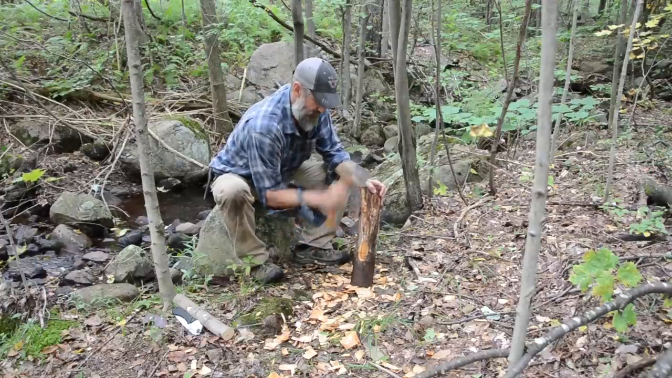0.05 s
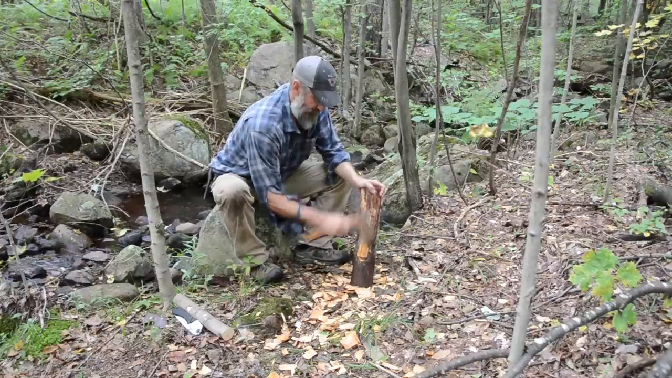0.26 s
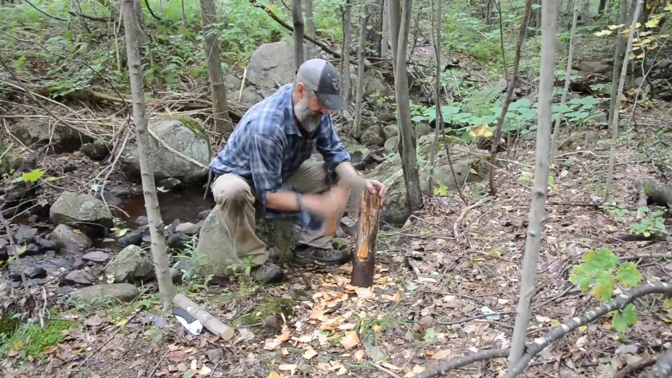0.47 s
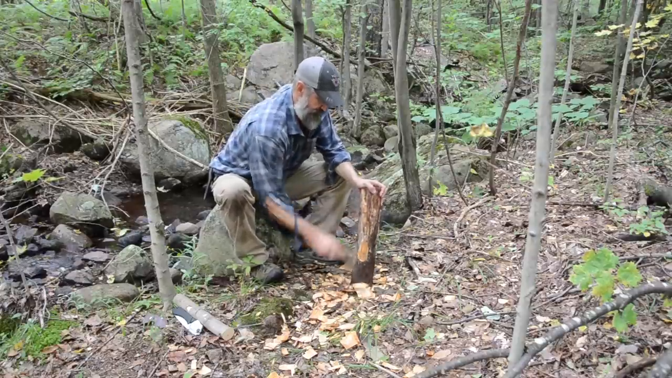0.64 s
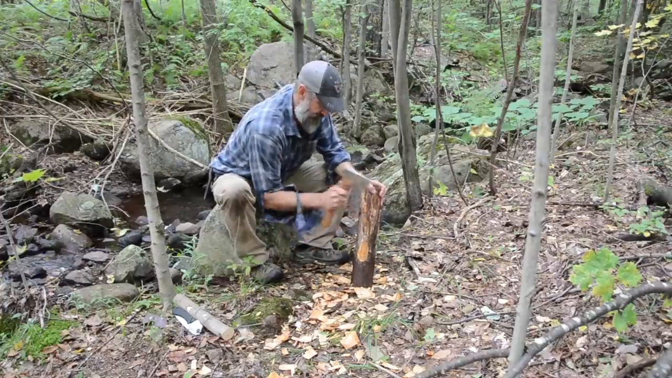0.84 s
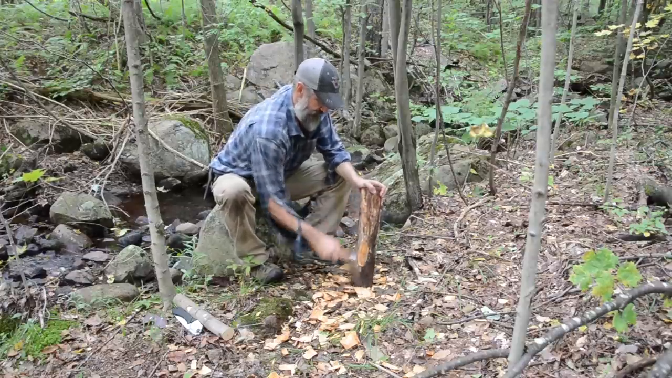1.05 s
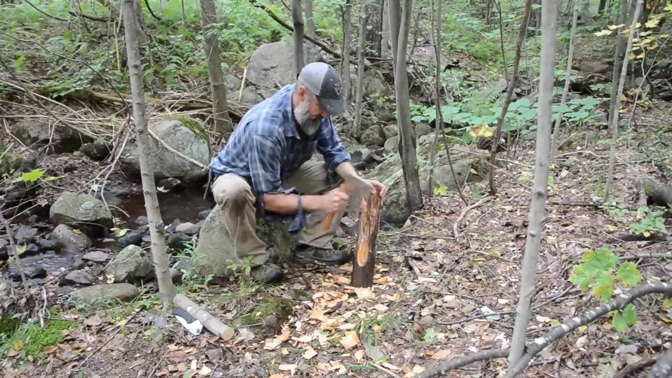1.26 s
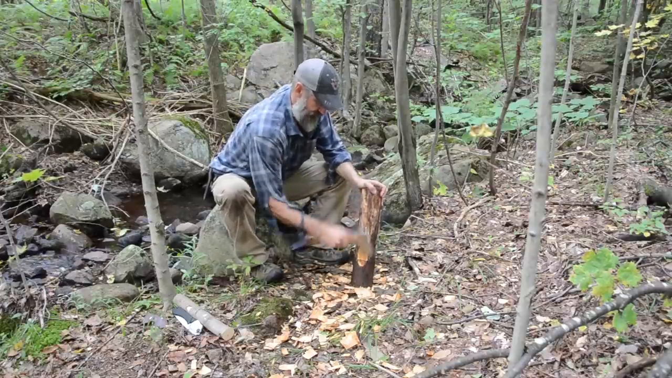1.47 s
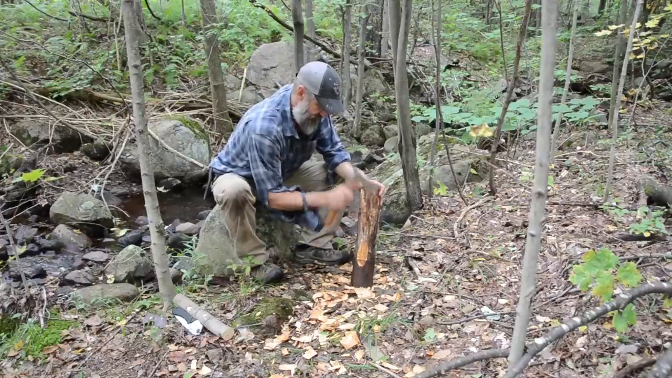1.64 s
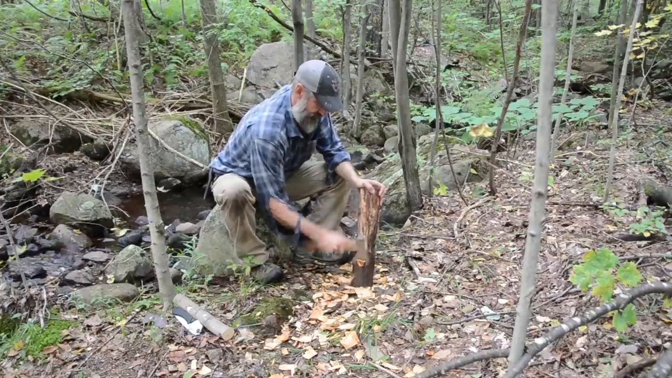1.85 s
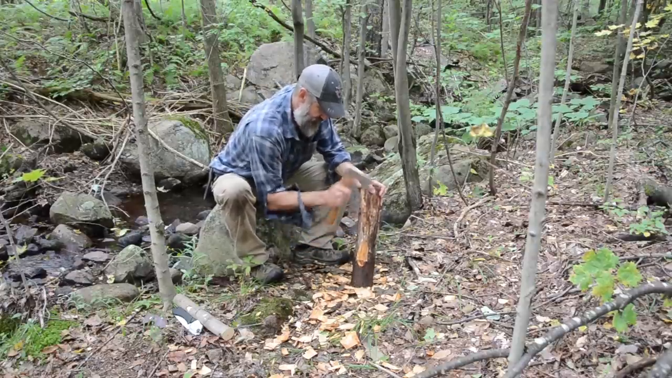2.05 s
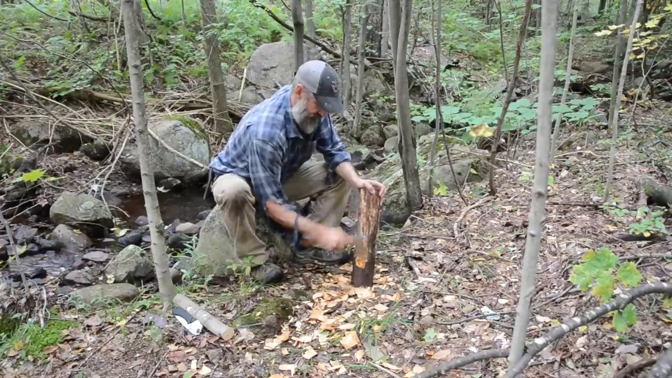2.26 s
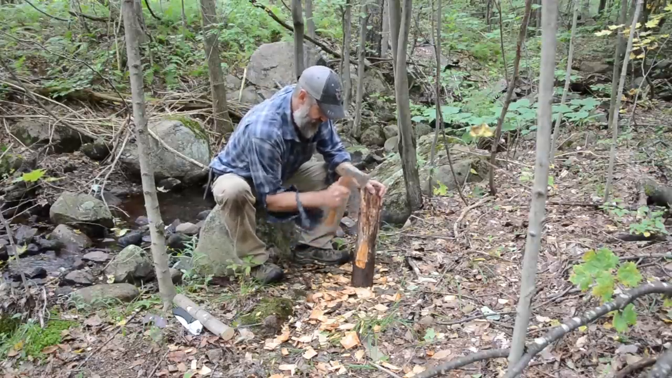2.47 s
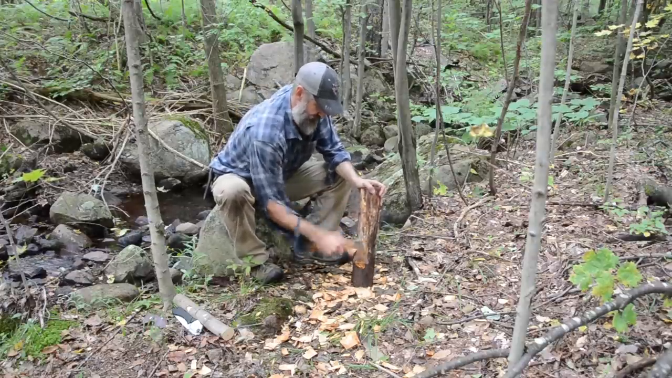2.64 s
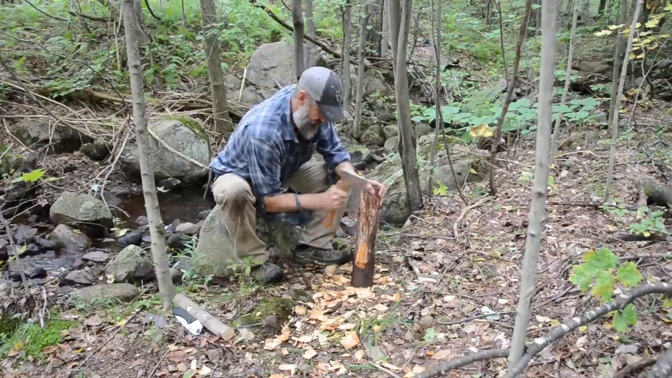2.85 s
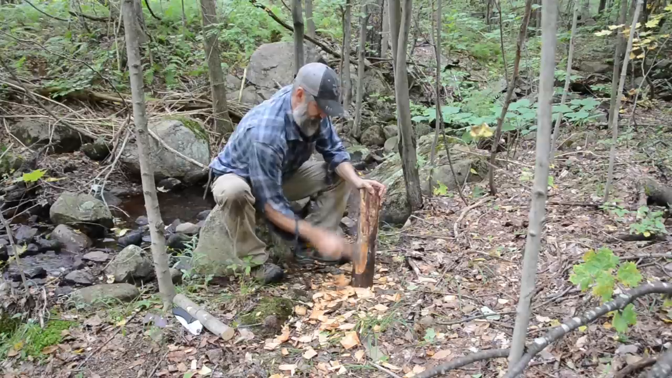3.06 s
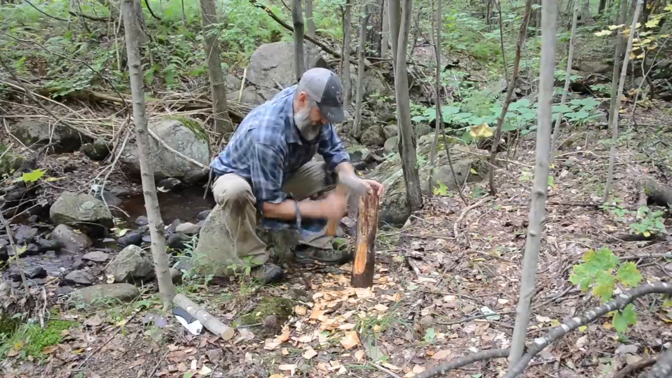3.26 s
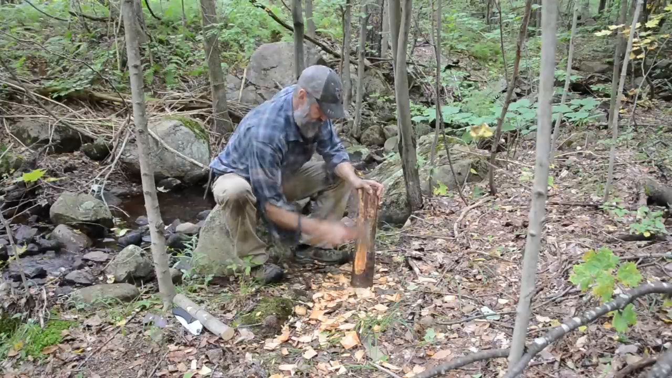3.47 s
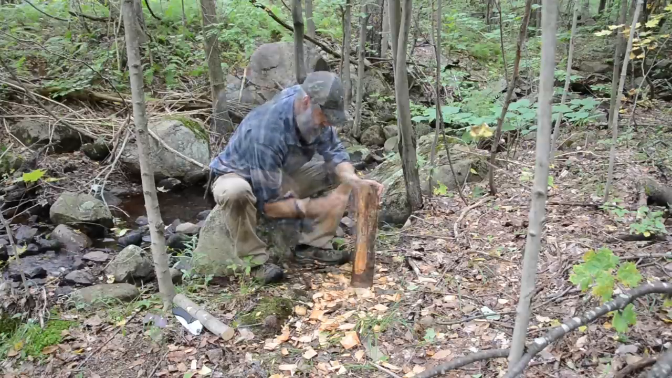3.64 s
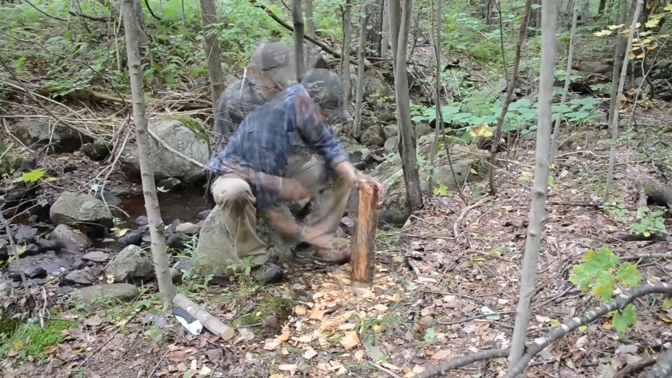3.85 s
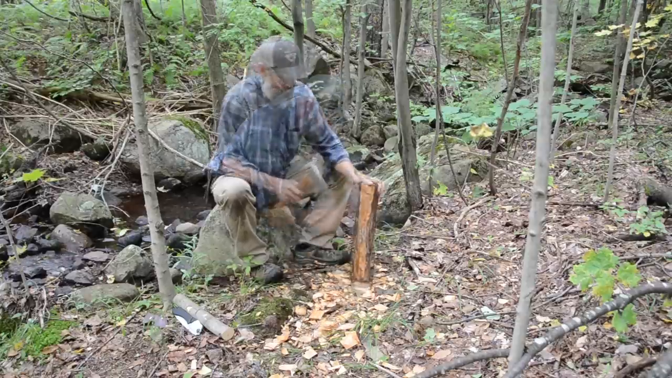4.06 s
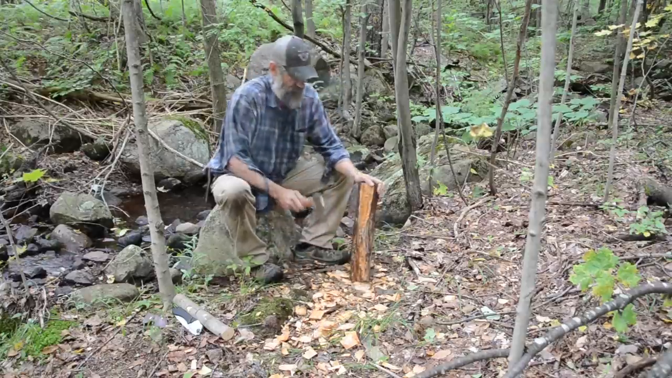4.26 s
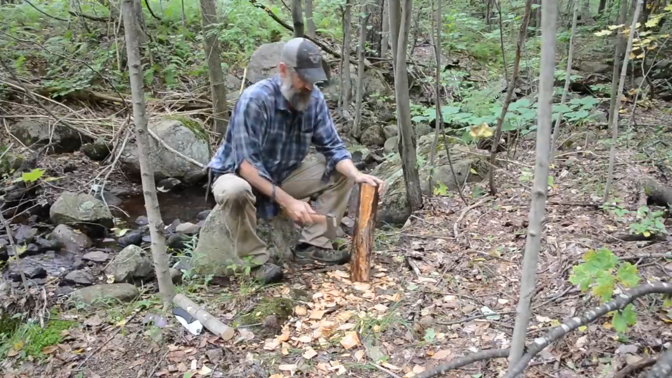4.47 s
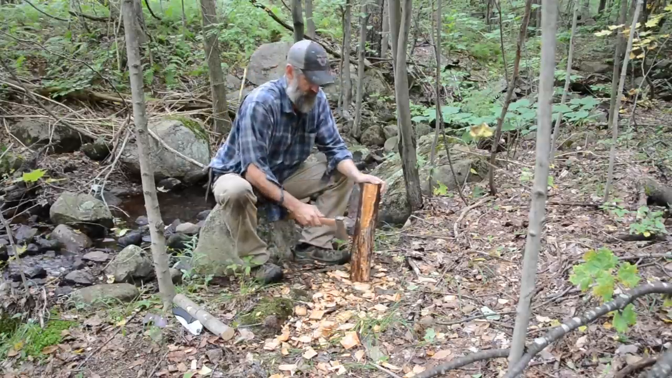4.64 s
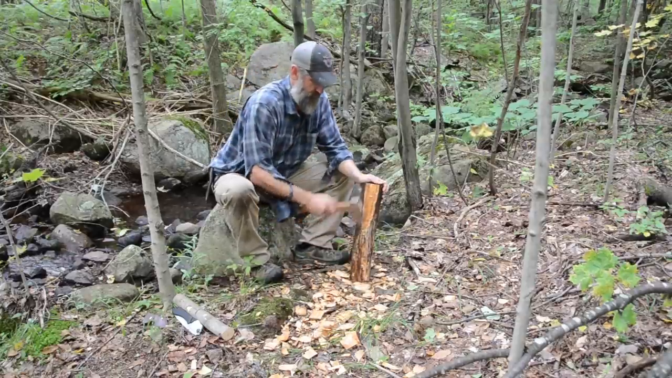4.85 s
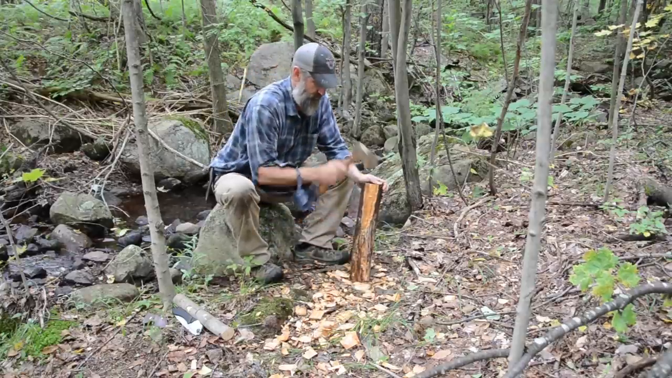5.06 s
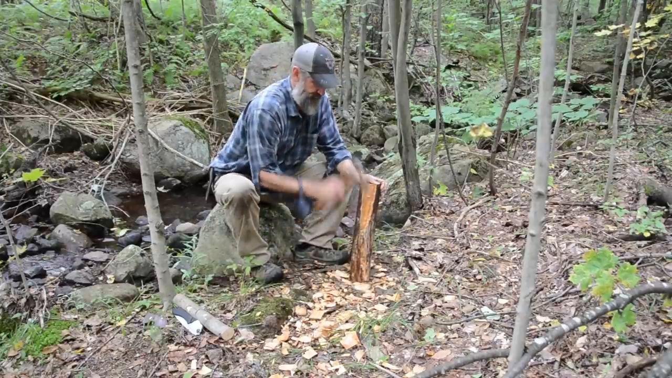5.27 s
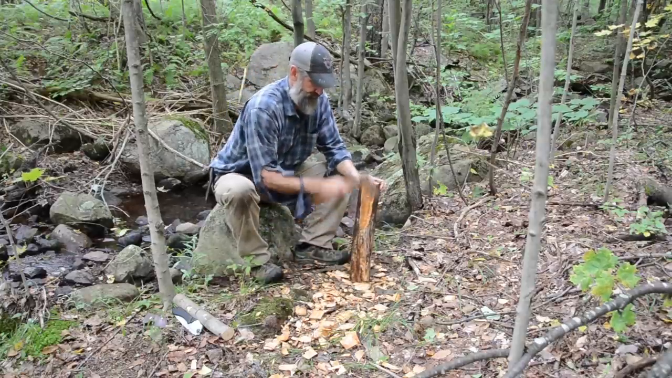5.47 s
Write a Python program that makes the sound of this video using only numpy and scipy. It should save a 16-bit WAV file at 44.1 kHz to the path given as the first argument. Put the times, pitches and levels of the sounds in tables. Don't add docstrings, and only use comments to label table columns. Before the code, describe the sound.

Outdoors in a wood, a hatchet strikes a small upright log ten times at an even pace of about 0.4 seconds. Each hard, dry crack overloads a microphone a few metres away, with splitting fibres, a dull log knock and short scatter off trunks. Chips tick and rustle into dry leaves. After about 3.9 seconds the blows stop and the creek is heard, with a faint cricket, then one weaker final chop.

```python
import sys
import numpy as np
from scipy import signal
from scipy.fft import rfft, irfft
from scipy.io import wavfile
from scipy.ndimage import uniform_filter1d

SR = 44100
rng = np.random.default_rng(int(sys.argv[2]) if len(sys.argv) > 2 else 0)


def file_out(sig):
    cols = np.atleast_2d(sig).T
    lim = np.clip(cols, -1, 1)
    pcm = np.round(lim * 32767).astype(np.int16)
    wavfile.write(sys.argv[1], SR, pcm)


def attenuation_scalar(level_db):
    decades = np.asarray(level_db, float) / 20
    return 10 ** decades


N = 242991

# start in seconds, peak level in dB, strongest log pitch in Hz,
# bite length in ms, edge crack level in dB.
BITES = [(0.202, 1.5, 1250, 5.2, 0), (0.602, 8, 1540, 4.4, -4), (1.0284, 8, 1510, 4.4, -9.5),
         (1.4519, 9, 1850, 2, -8.5), (1.8554, 6.5, 1360, 1.67, 2.5), (2.2523, 3.5, 1680, 3.06, -10.5),
         (2.644, 2.5, 1210, 3.1, -12), (3.0206, -0.5, 1170, 4.3, -5), (3.4171, 2.5, 1450, 3.57, -8),
         (3.8068, 6.5, 1670, 2.64, 1), (5.368, 0.5, 1180, 1.95, -19.5)]
# start in seconds, peak level in dB, log pitch in Hz,
# bite length in ms, edge crack level in dB.
SPLITS = [(0.6123, -2.5, 1240, 1.2, -4), (1.0325, -3, 1630, 2.6, 35), (1.041, 0.5, 1300, 3.5, 2),
          (1.454, 4, 1670, 1.8, 1), (1.860, 1, 1470, 2.14, -34), (1.8639, -3.5, 1700, 0.28, 27),
          (2.649, -1.5, 1560, 5.5, 4), (3.0289, 4, 940, 1.24, 11), (3.032, -8, 870, 2.9, 0),
          (3.8128, -3, 1070, 3.4, 3), (3.821, -9, 1676, 8.8, 6), (5.3717, -2, 1120, 4.2, -1)]
# start in seconds, peak level in dB, log pitch in Hz,
# contact length in ms.
ROCKS = [
    (0.6152, -6.5, 600, 1.12),
    (0.633, -13.5, 690, 3.4),
    (1.0669, -19, 600, 1.2),
    (3.039, -10, 615, 5.2),
    (3.0559, -12, 775, 2.55),
    (3.8295, -2.5, 770, 1.2),
]
# start in seconds, ground thud level in dB,
# level in dB of the low steel mode, level in dB of the high steel mode.
BLOWS = [(0.202, -46.5, -43, -63), (0.601, -35, -44, -59), (1.027, -34, -33, -30.5), (1.45, -44, -45, -60),
         (1.857, -52, -47, -60), (2.254, -43.5, -46, -68), (2.644, -41.5, -28, -61),
         (3.021, -33.5, -50.5, -75), (3.417, -41, -34, -57), (3.805, -37.5, -49, -60),
         (5.367, -53.5, -62, -58)]
# frequency in Hz, level in dB.
LOG_MODES = [(500, -23.5), (620, -44), (705, 7), (835, 2), (960, -36), (1085, 6), (1240, 0.5), (1390, 18.5),
             (1520, 15), (1635, 20), (1790, 14), (2050, 9)]
# frequency in Hz, level in dB.
EDGE_MODES = [(2300, 6), (2600, 12.5), (2950, 9.5), (3390, 19), (3850, 14), (4300, 6.5), (4800, 7.5),
              (5300, -9.5), (6500, -2.5), (7800, -9), (9500, -26), (12000, -26)]
# frequency in Hz, time to fall 60 dB in seconds.
STEEL_MODES = [(1640, 0.28), (2575, 0.51)]
# centre in Hz, width in octaves, level in dB,
# time to fall 60 dB in seconds.
WOODS = [(244, 0.81, -40.5, 0.19), (600, 1.28, -39.5, 0.24), (1170, 0.42, -38.5, 0.23),
         (1760, 0.24, -37, 0.3), (1500, 2, -61.5, 1), (2600, .7, -40.5, 0.161), (3846, 0.34, -39.5, 0.3),
         (3500, 2.6, -53, 0.54), (4900, 0.48, -32.5, 0.14), (6210, 1.03, -40, 0.4),
         (8500, 3.6, -55.5, 0.17), (12500, 0.54, -59, .16)]
# start in seconds, then low, edge and top
# levels in dB sent into the echoes.
FACING = [(.2, 16, -2, -12), (.6, 2, -1, -4), (1.02, 9.5, 3, -8.5), (1.45, -16.5, 3.5, 0.5),
          (1.85, 9, -2.5, 10), (2.25, 5, 5, -5), (2.64, 5.5, 4.5, -0.5), (3.02, 0.5, 5, 0),
          (3.41, 18, 1.5, 1), (3.8, -2, 1, 12), (5.36, 8, 7.5, -6)]
# start in seconds, knock level in dB, knock pitch in Hz,
# leaf crackle level in dB, length in ms.
CHIPS = [(.393, -31.5, 2190, -39, 7.1), (.408, -35.5, 1160, -46, 7.3), (0.468, -34.5, 2600, -53, 3.6),
         (.684, -29, 2480, -46, 4.7), (0.726, -35, 1500, -62, 4.3), (.899, -44, 795, -72, 3),
         (1.227, -30, 985, -33, 0.79), (1.259, -30, 3500, -42, 1.6), (1.355, -26.5, 2050, -45, 2.7),
         (1.437, -30, 2960, -54.5, 1.55), (3.274, -41, 1770, -49, 15), (3.314, -41, 4460, -51, 3.6),
         (3.366, -26, 2600, -44, 6.6), (3.661, -33.5, 1500, -55, 10), (3.675, -44.5, 1500, -58, 3.7),
         (4.086, -39, 1090, -73, 5.4), (5.4242, -25, 2770, -70, .6), (5.468, -42, 4500, -49, 2.2)]
# start in seconds, knock level in dB, leaf crackle level in dB,
# length in ms.
SKIDS = [
    (.815, -46, -57, 28),
    (.925, -37.5, -50, 11),
    (1.233, -29.5, -42, 12),
    (1.328, -42, -57, 49),
    (1.414, -42, -57, 26),
    (2.03, -40.5, -55, 19),
    (3.29, -35.5, -48, 14),
    (3.355, -37, -48, 7.6),
]
# start in seconds, knock level in dB, leaf crackle level in dB.
TICKS = [(0.141, -46, -54), (.322, -55, -53), (0.487, -42, -47), (0.507, -48, -58), (.743, -55, -60),
         (.846, -60, -60), (.86, -41, -55), (0.918, -44, -60), (1.189, -51, -62), (1.205, -57, -40),
         (1.213, -34, -48), (1.372, -34.5, -60), (1.385, -55, -50), (2.02, -53, -60), (2.156, -44, -57),
         (2.199, -41, -65), (2.215, -40, -58), (2.308, -46, -62), (2.333, -55, -45), (2.50, -47, -55),
         (3.011, -37, -61), (3.163, -43, -54), (3.263, -57, -51), (3.519, -40, -53)]
# start in seconds, end in seconds, peak level in dB,
# attack in seconds, fall in dB per second.
SCUFF = (.888, 1.025, -45, .012, 60)
# frequency in Hz, level in dB per Hz.
CREEK = [(20, -20), (45, -10.5), (110, -13.5), (200, -11), (330, -7), (480, -7), (1000, -6.5),
         (1730, -13.5), (3200, -14.5), (4400, -19), (5300, -18), (6400, -26.5), (12500, -48), (15000, -96)]
# time in seconds, burble level in dB.
FLOW = [
    (0.0, -56.5),
    (0.7, -58),
    (1.1, -54),
    (2.06, -57.5),
    (3.1, -56.5),
    (4.08, -55),
    (4.51, -54),
    (5.51, -55.5),
]
# start in seconds, pitch in Hz, level in dB.
DRIPS = [
    (.06, 1980, -50),
    (0.091, 2470, -49),
    (2.513, 3250, -49.5),
    (2.56, 2450, -46.5),
]
# frequency in Hz, peak level in dB.
DRONE = [(55.8, -70.5), (84, -71.5), (139.6, -62.5), (167, -71)]
# start in seconds, level in dB.
CRICKET = [
    (4.125, -71.5),
    (4.635, -71.5),
    (5.11, -72),
]
# frequency in Hz, sharpness (Q).
BODY_DIPS = [(5710, 2.7), (6900, 17)]

LOG_T60_S, EDGE_T60_S = .022, .009
ROCK_EDGE_DB = -19
BITE_FAR_DB, SPLIT_FAR_DB, ROCK_FAR_DB = -5.5, -14, -0.5
BLUR = .65
SCATTER_SHIFT = .03
BOULDER_S, BOULDER_DB = 0.03, -24.5
THUD_RISE_MS, JOLT_OVER_THUD_DB = 24, 10.5
CUT_S = 3.919
TICK_MS, SPLINTER_HZ = 1.1, 3060
LEAF_HZ, LEAF_SPREAD_OCT = 8500, 0.29
HISS_DB, HISS_PER_DB, USUAL_FLOW_DB = -1.5, 0.66, -54.5
CEILING, TOP_HZ = .475, 16700


def hatchet():
    before, after = np.zeros(N), np.zeros(N)
    echoes = {row[0]: woods() for row in FACING}
    contacts = [(*row, BITE_FAR_DB) for row in BITES]
    contacts += [(*row, SPLIT_FAR_DB) for row in SPLITS]
    contacts += [(*row, ROCK_EDGE_DB, ROCK_FAR_DB) for row in ROCKS]
    for s, *how in contacts:
        blow_s, *facing = max((row for row in FACING if row[0] < s + .03), key=lambda row: row[0])
        add(before if s < CUT_S else after, s, contact(*how, facing, echoes[blow_s]))
    for s, thud_db, *steel_db in BLOWS:
        body = steel_ring(steel_db) + ground_thud(thud_db)
        add(before if s < CUT_S else after, s, body)
    closing = np.clip((CUT_S - np.arange(N) / SR) / .002, 0, 1)
    return before * closing + after


def contact(db, hz, bite_ms, edge_db, far_db, facing, echo):
    fibres = snaps(1024, bite_ms, 3000.)
    fibres = np.convolve(fibres, np.exp(-np.arange(24) / 1.44))
    fibres = signal.sosfilt(signal.butter(3, 430, "highpass", fs=SR, output="sos"), fibres)
    log_hz, log_db = np.transpose(LOG_MODES)
    edge_hz, crack_db = np.transpose(EDGE_MODES)
    near_db = -np.where(log_hz < hz, 15, 12) * np.log2(log_hz / hz) ** 2
    modes_hz = np.r_[log_hz, edge_hz]
    modes_db = np.r_[log_db + near_db, crack_db + edge_db]
    t60 = np.r_[LOG_T60_S * (1400 / log_hz) ** .6, np.full(len(edge_hz), EDGE_T60_S)]
    near = signal.fftconvolve(fibres, ring(modes_hz, modes_db, t60, size=2000))

    far_t60 = BLUR * t60 * np.minimum(4000 / modes_hz, 1)
    blur = smear(modes_hz, modes_db, far_t60)
    low, edge, top = facing
    tint_db = np.interp(modes_hz, [900, 1300, 1900, 2400, 5400, 6400], [low, 0, 0, edge, edge, top])
    tinted = smear(modes_hz, modes_db + tint_db, far_t60)
    match = np.sqrt(np.sum(blur ** 2) / np.sum(near ** 2))
    out = attenuation_scalar(far_db) * signal.fftconvolve(tinted / match, echo)
    add(out, 0, near)
    return attenuation_scalar(db) * out / np.abs(near).max()


def steel_ring(levels_db):
    hz, t60 = np.transpose(STEEL_MODES)
    size = SR // 3
    build = np.clip(np.arange(size) / SR / .01, 0, 1)
    flutter = .45 + .85 * unit(uniform_filter1d(rng.standard_normal(size), size=200))
    return ring(hz, np.array(levels_db), t60, size) * build * flutter


def ground_thud(db):
    t = np.arange(SR // 3) / SR
    late = t * 1000 / THUD_RISE_MS
    roll = unit(band(rng.standard_normal(len(t)), 86.7, 2.04)) * late ** 2 * np.exp(2 - 2 * late)
    jolt = attenuation_scalar(JOLT_OVER_THUD_DB) * np.sin(2 * np.pi * 110 * t) * fade(t, 0.064)
    return attenuation_scalar(db) * (roll + jolt)


def woods():
    t = np.arange(SR // 2) / SR
    out = np.zeros(len(t))
    for hz, octaves, db, t60 in WOODS:
        centre = hz * (1 + SCATTER_SHIFT * rng.standard_normal())
        out += attenuation_scalar(db) * fade(t, t60) * band(rng.standard_normal(len(t)), centre, octaves)
    out *= np.clip(t / .003, 0, 1)
    out[int(BOULDER_S * SR)] += attenuation_scalar(BOULDER_DB)
    return out


def smear(hz, db, t60, size=1024):
    t = np.arange(size)[:, None] / SR
    modes = attenuation_scalar(db) * fade(t, t60) * np.sin(2 * np.pi * hz * t)
    power = np.abs(rfft(modes, axis=0)) ** 2
    pulse = irfft(np.sqrt(power.sum(axis=1)))
    return np.roll(pulse, size // 8)[:size // 4] * np.hanning(size // 4)


def snaps(size, length_ms, density):
    t = np.arange(size) / SR
    struck = rng.random(size) < density / SR
    thinning = np.exp(-(t / (max(length_ms, .2) / 1000)) ** 2)
    x = rng.standard_normal(size) * struck * thinning
    x[0] = 1
    return x


def chips():
    out = np.zeros(N)
    light = [*SKIDS, *[(*row, TICK_MS) for row in TICKS]]
    landings = [*CHIPS, *[(s, db, SPLINTER_HZ, *rest) for s, db, *rest in light]]
    for s, db, hz, crackle_db, length_ms in landings:
        touch = snaps(1800, length_ms, 9000.)
        crackle_hz = LEAF_HZ * 2 ** (LEAF_SPREAD_OCT * rng.standard_normal())
        knock = band(band(touch, hz, 2.4), .8 * hz, 2.8)
        crackle = band(touch, .9 * crackle_hz, 1.6)
        knock = attenuation_scalar(db) * knock / np.abs(knock).max()
        crackle = attenuation_scalar(crackle_db) * crackle / np.abs(crackle).max()
        add(out, s, knock + crackle)
    return out


def scuff():
    t = np.arange(N) / SR
    start, end, db, attack, fall = SCUFF
    rub = band(rng.standard_normal(N), 560.0, 2.5) * attenuation_scalar(3.6 * walk(69.3))
    since = np.clip(t - start, 0, end - start)
    return unit(rub) * np.clip(since / attack, 0, 1) ** 2 * attenuation_scalar(db - fall * since) * (t < end)


def creek():
    s, burble_db = np.transpose(FLOW)
    t = np.arange(N) / SR
    hz, db = np.transpose(CREEK)
    f = np.maximum(np.fft.rfftfreq(N, 1 / SR), 1)
    colour = attenuation_scalar(np.interp(np.log(f), np.log(hz), db))
    burble = irfft(rfft(rng.standard_normal(N)) * colour * (f > 250) * (f < 1500), N)
    hiss_db = np.interp(t, s, HISS_DB + HISS_PER_DB * (burble_db - USUAL_FLOW_DB))
    out = np.zeros(N)
    for centre in np.arange(5, 14.5):
        share = np.cos(np.pi / 2 * np.clip(np.log2(f) - centre, -1, 1))
        water = irfft(rfft(rng.standard_normal(N)) * colour * share, N)
        tilt = np.clip((centre - 10.5) / 1.2, 0, 1) * hiss_db
        out += water * attenuation_scalar(tilt + 0.18 * walk(0.84) + 1.4 * walk(28))
    out /= np.sqrt(np.mean(burble ** 2))
    for when, pitch, size in rng.random((220, 3)):
        add(out, when * N / SR, bubble(350 * 2 ** (2.6 * pitch), -4 - 12 * size, 11.6))
    out *= attenuation_scalar(np.interp(t, s, burble_db))
    for when, drip_hz, drip_db in DRIPS:
        add(out, when, bubble(drip_hz, drip_db, 22., .015))
    return out


def bubble(hz, db, cycles, glide=0.18):
    u = np.arange(1200) / SR * hz / cycles
    return attenuation_scalar(db) * np.sin(2 * np.pi * cycles * u * (1 + glide * u)) * u * np.exp(1 - 2 * u)


def drone():
    out = np.zeros(N)
    for hz, db in DRONE:
        phase = 2 * np.pi * np.cumsum(hz * (1 + .008 * walk(5))) / SR
        out += attenuation_scalar(db + 2 * walk(3)) * np.sin(phase)
    return out


def cricket():
    pulses, t = np.zeros(N), np.arange(SR // 7) / SR
    for s, db in CRICKET:
        add(pulses, s, attenuation_scalar(db) * np.clip(np.sin(2 * np.pi * 22 * t), 0, 1) * (1.65 + 6 * t))
    return pulses * np.sqrt(2) * np.sin(2 * np.pi * np.cumsum(5030 + 70 * walk(60)) / SR)


def unit(x):
    return x / np.sqrt(np.mean(x ** 2))


def add(out, s, x):
    i = int(s * SR)
    out[i:i + len(x)] += x[:len(out) - i]


def band(x, hz, octaves):
    edges = np.clip(hz * 2 ** (np.array([-.5, .5]) * octaves), 10, .45 * SR)
    return signal.sosfilt(signal.butter(2, edges, "bandpass", fs=SR, output="sos"), x)


def fade(t, t60):
    return np.exp(-np.log(1000) * t / t60)


def ring(hz, db, t60, size):
    t = np.arange(size)[:, None] / SR
    return (attenuation_scalar(db) * fade(t, t60) * np.sin(2 * np.pi * hz * t)).sum(axis=1)


def walk(rate):
    k = int(SR / rate)
    held = np.repeat(rng.standard_normal(N // k + 1), k)
    return 1.4 * uniform_filter1d(uniform_filter1d(held, k), k)[:N]


def scene():
    return (hatchet() + chips() + scuff() + creek() + drone() + cricket())[None]


def band_limit(x):
    return signal.sosfilt(signal.butter(12, 16850, fs=SR, output="sos"), x)


def record(dry):
    for hz, sharpness in BODY_DIPS:
        dry = .8 * signal.lfilter(*signal.iirnotch(hz, sharpness, SR), dry) + .2 * dry
    over = dry / CEILING
    clipped = CEILING * over / (1 + over ** 8) ** (1 / 8)
    top_cut = signal.cheby2(8, 35, TOP_HZ, fs=SR, output="sos")
    mix = signal.sosfiltfilt(top_cut, clipped)
    return band_limit(mix)


dry = scene()
out = record(dry)
file_out(out)
```